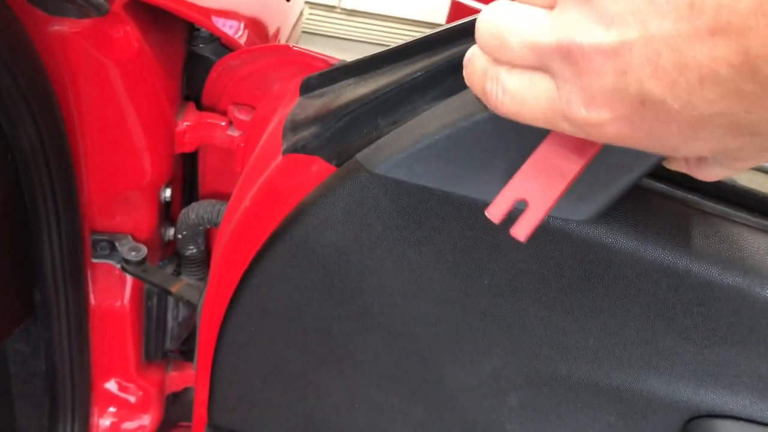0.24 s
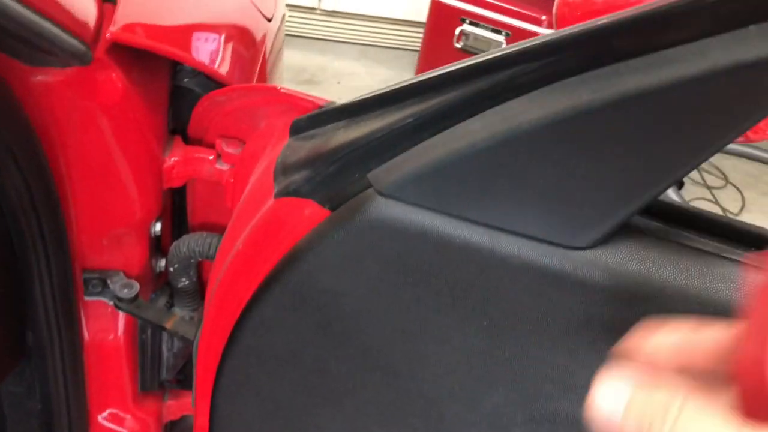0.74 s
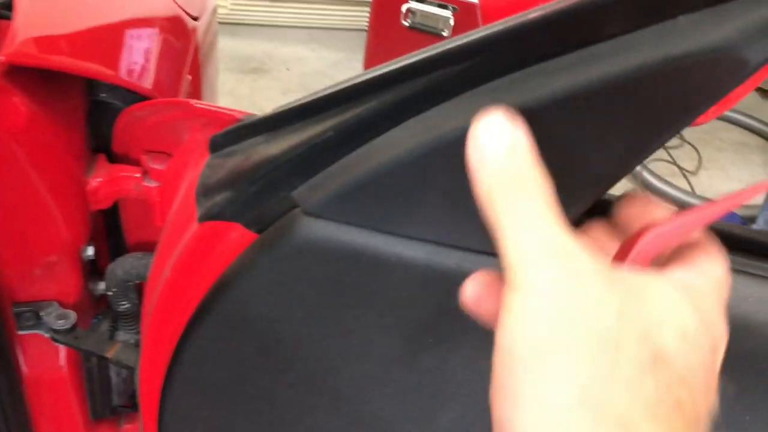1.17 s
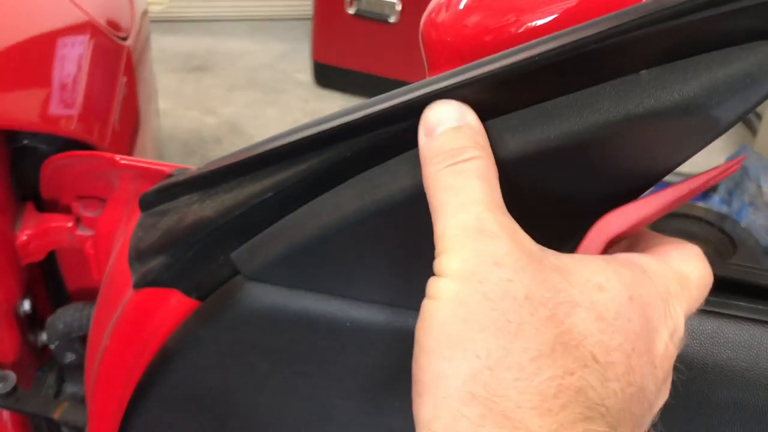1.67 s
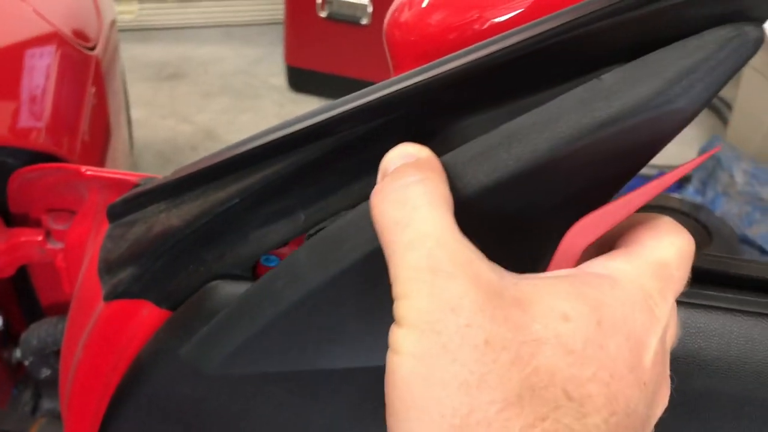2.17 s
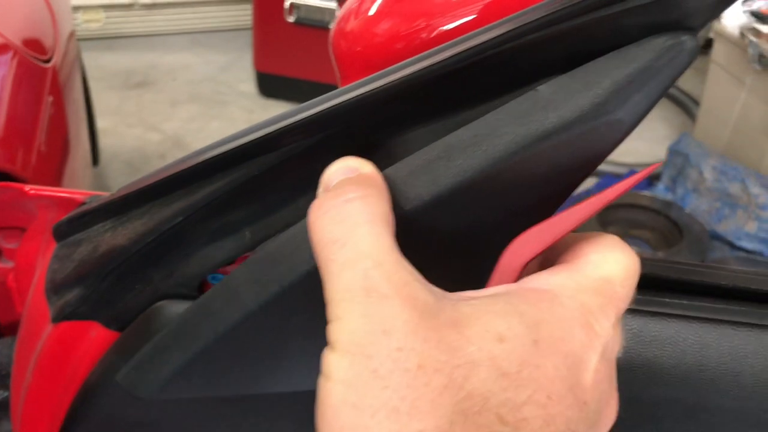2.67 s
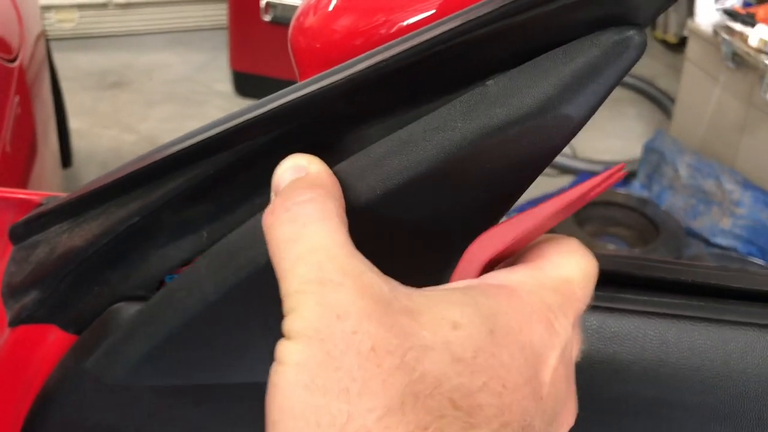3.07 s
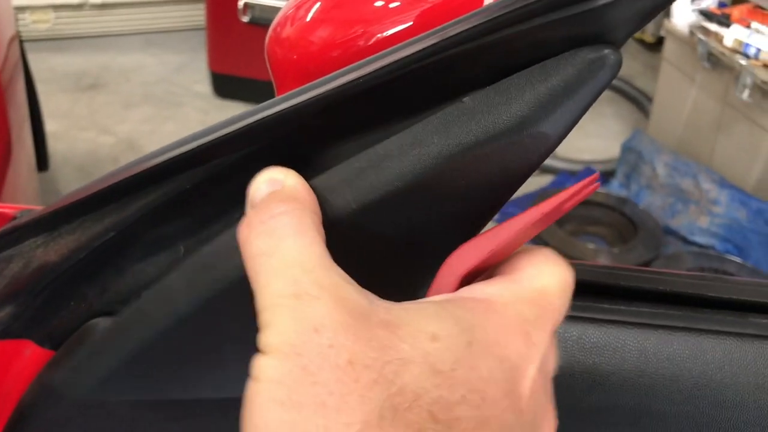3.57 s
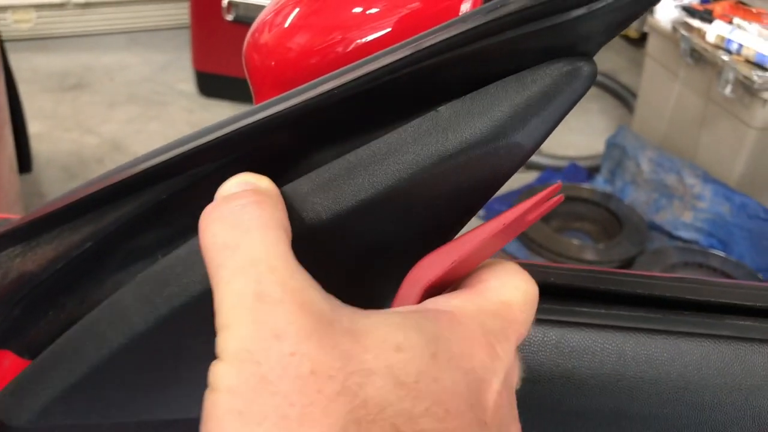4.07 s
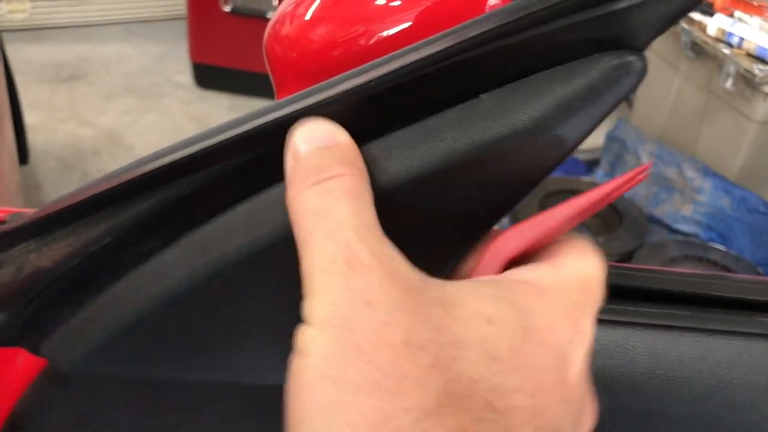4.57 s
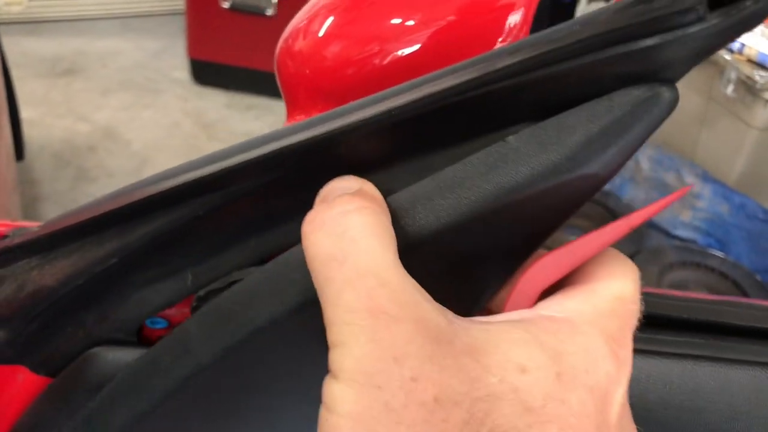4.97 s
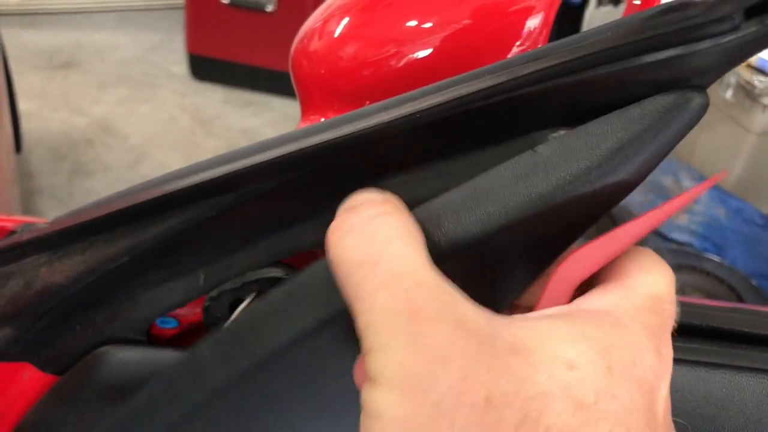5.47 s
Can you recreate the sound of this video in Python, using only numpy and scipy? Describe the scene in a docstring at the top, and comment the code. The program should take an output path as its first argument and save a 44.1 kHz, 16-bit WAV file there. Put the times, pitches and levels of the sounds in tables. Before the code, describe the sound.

Light plastic taps and finger rubs lead to sharp clicks and short creaks as trim is pulled off a car door in a quiet garage.

```python
"""Prying a trim panel off a car door.

In a garage, a plastic pry tool scrapes and snaps out of the gap; then the panel's clips click and
creak in stick-slip bursts. Each slip spreads through the panel as a bending wave, treble first.
The tool taps, fingers rub and the loose panel bumps the door. Behind the work and its short echo
are room air, a low hum, thin hiss and faint whirs."""
import sys
import numpy as np
from scipy import signal
from scipy.fft import rfft, irfft, next_fast_len
from scipy.io import wavfile

SR = 44100
rng = np.random.default_rng(int(sys.argv[2]) if len(sys.argv) > 2 else 0)


def output_pcm(signal):
    """Save a mono or channel-first signal as 16-bit PCM at the path in sys.argv[1].

    Samples are clipped to [-1, 1] before scaling.
    """
    pcm = np.clip(np.atleast_2d(signal).T, -1, 1) * 32767
    wavfile.write(sys.argv[1], SR, np.round(pcm).astype(np.int16))


N = 252241
TIME = np.arange(N) / SR
IR_SAMPLES = 16384
HZ = np.fft.rfftfreq(IR_SAMPLES, 1 / SR) + 1
BLOW = np.sqrt(SR / 1000)  # impulse with the energy of 1 ms at full scale


# Each row: first and last slip in seconds, slip count, final level in dB, rise to it in dB,
# bass in dB, treble in dB.
CLIP_CREAKS = [ (2.994, 3.0322, 6, -26.5, 16.5, -1.5, 1), (3.169, 3.186, 3, -31.5, 5.5, 6, -3.5),
               (3.287, 3.3715, 13, -30, 30.5, 4.5, 1.5), (3.484, 3.5259, 8, -26, 6, -0.5, 0.5),
               (3.7185, 3.7381, 3, -28.5, 9.5, 3, 1.5), (3.894, 3.9113, 5, -31, -4.5, -8.5, -9),
               (4.1498, 4.1638, 3, -24, 2.5, -4.5, -4), ]

def creaks(scatter_db=1.03, bite_power=1.8, stick_power=.22):
    """Stick-slip: the harder a clip bites, the longer it sticks and the louder it lets go."""
    out = np.zeros(N)
    for first_s, last_s, slips, final_db, rise_db, bass_db, treble_db in CLIP_CREAKS:
        gaps = np.geomspace(1, undb(rise_db) ** stick_power, slips - 1)
        onsets = np.append(0, np.cumsum(gaps))
        for progress in onsets / onsets[-1]:
            db = final_db - rise_db * (1 - progress) ** bite_power
            db += scatter_db * rng.standard_normal()
            add(out, first_s + progress * (last_s - first_s), slip(db, bass_db, treble_db))
    return out


# Each row: start in seconds, level in dB, bass in dB, treble in dB, clip ring in Hz.
CLIP_CLICKS = [ (0.848, -67.5, -26, 22, 7100), (2.874, -21, -6, 3, 8300), (3.1468, -29.5, -10, -13, 2500),
               (3.201, -22.5, -6.5, -3.5, 3180), (3.4737, -27.5, -8, -1.5, 2540),
               (3.8753, -33, 0, -6.5, 2500), (4.938, -57, -25, 12, 6800), (5.0719, -22, -5.5, -6, 1870),
               (5.0833, -19.5, -6.5, 1, 1790), (5.099, -20, -9.5, 0.5, 1830), ]

def clicks():
    """A clip jumps in its socket and rings."""
    out = np.zeros(N)
    for start_s, db, bass_db, treble_db, ring_hz in CLIP_CLICKS:
        add(out, start_s, slip(db, bass_db, treble_db, rings=[(ring_hz, 6)]))
    return out


# Each row: frequency in Hz, gain in dB.
PANEL_SPECTRUM = [(60, -8), (150, -7), (330, 3), (480, 1.5), (620, 8), (760, 6), (1000, -0.5), (2000, -3),
                  (3500, -2.5), (6000, 0.5), (9000, 3), (10500, -7), (13000, -8.5), (16000, -28)]
# Each row: resonance in Hz, width in Hz, peak in dB.
PANEL_MODES = [(177.4, 23, 12.4), (236, 20, 8.9), (329, 30, 8.8), (423.5, 15, 11.6), (521, 11, 6.9),
               (617, 143, 8), (692, 8.3, 1.5), (901, 60, 7), (1380, 320, 8.2), (1877, 150, 8.9),
               (2626, 203, 10.3), (3120, 410, 7.7), (4670, 180, 4.7), (5440, 190, 9.8), (5860, 510, 8.3),
               (6930, 360, 4.2), (8500, 120, 1.3)]

def slip(db, bass_db, treble_db, rings=(), ring_q=6):
    """One release through the panel's resonances; rings (Hz, dB) belong to the part that let go."""
    ring = resonances([(hz, hz / ring_q, peak_db) for hz, peak_db in rings])
    gain = spectrum(PANEL_SPECTRUM, PANEL_MODES) * shelves(bass_db, treble_db) * ring
    return undb(db) * through(release(split_hz=1720), ringing(gain))


# Each row of both: band in Hz, level in dB, T60 in seconds.
CRACK_BANDS = [(1580, 4, 0.031), (3560, 0, 0.0089), (7900, -2, 0.012)]
WASH_BANDS = [(306, -3.5, 0.12), (700, 0, 0.068), (2200, -8, 0.058), (7200, -8.5, 0.031)]

def release(split_hz):
    """Plastic lets go: a clean push in the bass, a ragged treble crack, a wash of dense modes."""
    treble_share = 1 / (1 + (split_hz / HZ) ** 4)
    push = ringing(np.sqrt(1 - treble_share))
    crack = through(diffuse(CRACK_BANDS), ringing(np.sqrt(treble_share)))
    return BLOW * (push + crack + diffuse(WASH_BANDS))


def bending(x, lag_s, direct_share, knee_hz=920, steepness=4.23):
    """Bending waves are slower at low pitch, so the hollow knock arrives after the crack."""
    size = next_fast_len(N + IR_SAMPLES)
    hz = np.fft.rfftfreq(size, 1 / SR)
    delay_s = lag_s / (1 + (hz / knee_hz) ** steepness)
    turns = np.cumsum(delay_s) * SR / size
    paths = direct_share + (1 - direct_share) * np.exp(2j * np.pi * (turns[-1] - turns))
    return irfft(rfft(x, size) * paths, size)[:N]


# Each row: hardest pull in seconds, level in dB, swell in dB/s, fade in dB/s.
BLADE_DRAGS = [(0.513, -36.5, 506, 1500), (0.534, -33.5, 1500, 700)]
# Each row: start in seconds, blade level in dB, door thud in dB.
BLADE_SNAPS = [(0.5251, -33, -63), (0.5337, -20.5, -25.5), (0.5379, -25, -46)]
# Each row of both: frequency in Hz, gain in dB.
BLADE_SPECTRUM = [(100, -36), (500, -8), (1000, -8.5), (1600, -4.5), (2500, -12.5), (4000, -6.5),
                  (7000, -7.5), (8200, -13), (10000, -13.5), (16000, -34)]
DOOR_SPECTRUM = [(30, -15), (80, 6.5), (170, 3), (330, 1.5), (600, 5), (1200, -39), (4000, -35)]
# Each row of both: resonance in Hz, width in Hz, peak in dB.
BLADE_MODES = [(1655, 126, 18.5), (1733, 59, 15), (2026, 36, 18.5), (2410, 65, 15.5), (2990, 230, 12.5),
               (5500, 310, 6)]
DOOR_MODES = [(82.6, 12, 5.5), (120, 24, 0.5), (166.6, 11, 14), (336, 53, 10.5)]

def pry_tool():
    """The blade drags over the panel's edge, springs free and thumps the door."""
    pull, door_force = np.zeros(N), np.zeros(N)
    for peak_s, db, swell, fade in BLADE_DRAGS:
        pull += undb(db - np.maximum(swell * (peak_s - TIME), fade * (TIME - peak_s)))
    blade_force = pull * grit(N, spread_db=3.5)
    for start_s, db, thud_db in BLADE_SNAPS:
        snap = release(split_hz=2900)
        add(blade_force, start_s, undb(db) * snap)
        add(door_force, start_s, undb(thud_db) * snap)
    blade = through(blade_force, ringing(spectrum(BLADE_SPECTRUM, BLADE_MODES)))
    door = through(door_force, ringing(spectrum(DOOR_SPECTRUM, DOOR_MODES)))
    return blade + door


# Each row: start in seconds, level in dB, bass in dB, treble in dB.
TOOL_TAPS = [ (0.065, -46.5, 0.5, -26), (0.228, -43, -11, -7), (0.3598, -32.5, -16, -13),
             (1.0445, -34.5, -2, -11.5), (1.0562, -43, 10, 7), (1.511, -52, 9, -2), (1.779, -47.5, 4, -6),
             (1.8716, -25.5, -9, -17.5), (2.0821, -33.5, -8.5, -14), (2.237, -43, 0.5, -26),
             (2.451, -40.5, -9, -20), (4.3962, -40.5, 2.5, -7), (4.4182, -28.5, -9, -4.5),
             (4.5098, -49, 16.5, 14), (5.2422, -47, 3.5, 4), (5.5495, -40.5, 12, 1), (5.6955, -39, 9, -0.5),
             ]

def taps_and_ticks(ring_hz=1680, ticks_per_s=1.7, tick_db=-59, spread_db=2.5):
    """The tool knocks on the trim and rings; the flexing plastic ticks faintly at random."""
    out = np.zeros(N)
    for start_s, db, bass_db, treble_db in TOOL_TAPS:
        add(out, start_s, slip(db, bass_db, treble_db, rings=[(ring_hz, 11)]))
    for position, strength in rng.random((int(ticks_per_s * N / SR), 2)):
        db = tick_db + spread_db * (2 * strength - 1)
        add(out, position * N / SR, slip(db, bass_db=-2, treble_db=-1, rings=[(ring_hz, 6)]))
    return out


# Each row: start in seconds, level in dB.
PANEL_BUMPS = [(1.052, -40), (1.875, -43.5), (2.105, -44), (3.037, -45), (3.491, -41), (3.513, -38.5),
               (3.74, -40), (4.162, -33.5), (5.552, -34), (5.696, -44)]
# Each row: frequency in Hz, gain in dB.
BUMP_SPECTRUM = [(60, -17), (120, -31.5), (150, 3.5), (185, 6.5), (240, -3.5), (350, -6), (600, -7.5),
                 (1500, -27), (6000, -65)]

def bumps():
    """Soft, dull knocks of the loose panel on the door."""
    out = np.zeros(N)
    knock = BLOW * ringing(spectrum(BUMP_SPECTRUM))
    for start_s, db in PANEL_BUMPS:
        add(out, start_s, undb(db) * knock)
    return out


# Each row: start and end in seconds, level in dB, treble in dB.
FINGER_RUBS = [ (0.352, 0.455, -60, -4), (1.096, 1.174, -64, 12), (1.186, 1.279, -56, 5),
               (1.347, 1.372, -61.5, 3), (1.446, 1.548, -63, 6.5), (1.712, 1.862, -62.5, 5),
               (1.854, 2.137, -66, 5.5), (2.083, 2.132, -48, 0.5), (2.525, 2.606, -54, -8),
               (3.886, 3.933, -50, 3), (4.014, 4.147, -58.5, 0.5), (4.139, 4.149, -46.5, 15),
               (4.333, 4.382, -52, -1), (4.495, 4.624, -62, 11.5), (4.672, 4.721, -56.5, -1),
               (5.314, 5.378, -61.5, -5), ]
# Each row: frequency in Hz, gain in dB.
RUB_SPECTRUM = [(100, -4), (200, 7), (700, 3), (1600, 0.5), (3000, -3.5), (6000, -3), (9000, -10),
                (12000, -17.5), (16000, -26)]
# Each row: resonance in Hz, width in Hz, peak in dB.
RUB_MODES = [(630, 46, 6.5), (1295, 80, 5.5), (1666, 87, 8.5), (2630, 120, 10)]

def fingers():
    """Short gritty strokes swell and fade as the grip shifts, coloured by the plastic."""
    out = np.zeros(N)
    plastic = spectrum(RUB_SPECTRUM, RUB_MODES)
    for start_s, end_s, db, treble_db in FINGER_RUBS:
        size = int((end_s - start_s) * SR)
        stroke = grit(size, spread_db=4.0) * signal.windows.tukey(size, .7)
        response = ringing(plastic * shelves(0, treble_db))
        add(out, start_s, undb(db) * through(np.pad(stroke, (0, IR_SAMPLES)), response))
    return out


def grit(size, spread_db, catch_samples=32):
    """Friction: dense tiny catches of very unequal strength, rms 1."""
    catch_db = spread_db * rng.exponential(size=size // catch_samples + 1).clip(0, 4)
    catches = np.repeat(undb(catch_db), catch_samples)[:size]
    return unit_energy(catches * rng.standard_normal(size)) * np.sqrt(size)


# Each row: band in Hz, level in dB, T60 in seconds.
ECHO_BANDS = [(111, 2, 0.22), (402, -10, 0.34), (900, -15, .42), (2650, -16, 0.46), (6750, -22, 0.79),
              (12800, -17.5, 0.39)]

def garage_echo(x, delay_s=.012):
    """Diffuse echo from the car's side, the floor and the walls."""
    out = np.zeros(N)
    add(out, delay_s, through(x, diffuse(ECHO_BANDS)))
    return out


# Each row: frequency in Hz, gain in dB.
AIR_SPECTRUM = [(18, -57), (30, -14), (40, 5.5), (55, 3), (85, -2.5), (160, -1), (300, -8.5), (500, -15),
                (1000, -14.5), (1800, -17.5), (2800, -21), (5000, -26.5), (9700, -49), (11000, -28.5),
                (16000, -33.5)]

def room_air(low_db=-63, high_db=-71, split_hz=700):
    """A wavering rumble with a steadier hiss above it."""
    gain = spectrum(AIR_SPECTRUM)
    low_share = 1 / (1 + (HZ / split_hz) ** 4)
    rumble = undb(low_db) * wavering_noise(gain * np.sqrt(low_share), waver_db=2.5)
    return rumble + undb(high_db) * wavering_noise(gain * np.sqrt(1 - low_share), waver_db=1.64)


def low_hum(hz=59.2, rms_db=-65.5):
    """A low tone in the room's rumble."""
    return undb(rms_db) * np.sqrt(2) * np.sin(2 * np.pi * hz * TIME)


# Each row: centre in Hz, width in Hz, level in dB, waver in dB.
HISS_BANDS = [(6657, 640, -65, -0.9), (8800, 1700, -81.5, 2), (9610, 450, -83, 2.5)]

def hiss():
    """Thin high bands of noise, like insects outdoors."""
    return sum(undb(db) * wavering_noise(hump(hz, width_hz), waver_db, rate_hz=15)
               for hz, width_hz, db, waver_db in HISS_BANDS)


# Each row: start and end in seconds, first and last pitch in Hz, width in Hz, level in dB.
DISTANT_WHIRS = [(0.018, 1.06, 1697, 1757, 151, -74), (4.8, 5.2, 4470, 3700, 900, -76.5),
                 (5.186, 5.663, 3680, 3430, 510, -74.5)]

def whirs(ramp_s=0.017):
    """Faint distant whirs: narrow bands of noise that glide in pitch."""
    out = np.zeros(N)
    for start_s, end_s, first_hz, last_hz, width_hz, db in DISTANT_WHIRS:
        gate = np.clip(np.minimum(TIME - start_s, end_s - TIME) / ramp_s, 0, 1)
        turns = np.cumsum(np.interp(TIME, [start_s, end_s], [first_hz, last_hz])) / SR
        flutter = wavering_noise(hump(0, width_hz), waver_db=4.0)
        out += undb(db) * gate * flutter * np.sqrt(2) * np.sin(2 * np.pi * turns)
    return out


def wavering_noise(gain, waver_db, rate_hz=14):
    """Coloured noise whose level wanders around rms 1."""
    noise = through(rng.standard_normal(N + IR_SAMPLES), ringing(gain))[IR_SAMPLES:]
    wander = np.interp(TIME * rate_hz, np.arange(N), rng.standard_normal(N))
    return unit_energy(noise) * np.sqrt(N) * undb(waver_db * wander)


def diffuse(bands):
    """Many overlapping echoes: noise that dies away band by band."""
    hz, levels_db, t60s = np.transpose(bands)
    edges_hz = np.concatenate([[40], np.sqrt(hz[1:] * hz[:-1]), [18000]])
    out = np.zeros(IR_SAMPLES)
    for low_hz, high_hz, db, t60_s in zip(edges_hz, edges_hz[1:], levels_db, t60s):
        decay = undb(-60 * TIME[:IR_SAMPLES] / t60_s)
        burst = unit_energy(rng.standard_normal(IR_SAMPLES) * decay)
        bandpass = signal.butter(2, [low_hz, high_hz], "band", fs=SR)
        out += undb(db) * signal.lfilter(*bandpass, burst)
    return out


def spectrum(points, modes=()):
    """Gain per frequency, rms 1: a smooth curve with resonances standing on it."""
    hz, db = np.transpose(points)
    gain = undb(np.interp(np.log(HZ), np.log(hz), db)) * resonances(modes)
    return gain / np.sqrt(np.mean(gain ** 2))


def resonances(modes):
    """Gain per frequency of peaks above a flat line."""
    power = np.ones(len(HZ))
    for hz, width_hz, db in modes:
        power += (undb(db) ** 2 - 1) / (1 + (2 * (HZ - hz) / width_hz) ** 2)
    return np.sqrt(power)


def shelves(bass_db, treble_db, bass_hz=1000, treble_hz=4000):
    """Gain per frequency: heavier contacts have more bass, harder ones more treble."""
    return undb(bass_db / (1 + (HZ / bass_hz) ** 2) + treble_db / (1 + (treble_hz / HZ) ** 4))


def hump(hz, width_hz):
    """Gain per frequency of one narrow band."""
    return 1 / (1 + np.abs(2 * (HZ - hz) / width_hz) ** 2.3)


def ringing(gain):
    """Minimum-phase impulse response with this gain: starts at once and rings out."""
    cepstrum = irfft(np.log(gain + 1e-6))
    cepstrum[1:IR_SAMPLES // 2] *= 2
    cepstrum[IR_SAMPLES // 2 + 1:] = 0
    return irfft(np.exp(rfft(cepstrum)))


def through(x, response):
    """Pass x through an impulse response."""
    return signal.fftconvolve(x, response)[:len(x)]


def add(out, start_s, x):
    """Mix x into out from start_s."""
    i = int(start_s * SR)
    out[i:i + len(x)] += x[:N - i]


def undb(db):
    """Decibels to gain."""
    return 10 ** (db / 20)


def unit_energy(x):
    """Scale to unit energy."""
    return x / np.sqrt(np.sum(x ** 2))


def scene():
    """The work on the door, its echo and the quiet garage, in mono."""
    clips = bending(creaks() + clicks(), lag_s=.00941, direct_share=.14)
    taps = bending(taps_and_ticks(), lag_s=.008, direct_share=.25)
    work = clips + taps + bumps() + pry_tool() + fingers()
    return (work + garage_echo(work) + room_air() + low_hum() + hiss() + whirs())[None]


def record(dry):
    """Steep low-pass at 16.2 kHz."""
    return signal.sosfilt(signal.ellip(10, .2, 70, 16200, fs=SR, output="sos"), dry)


dry = scene()
out = record(dry)
output_pcm(out)
```